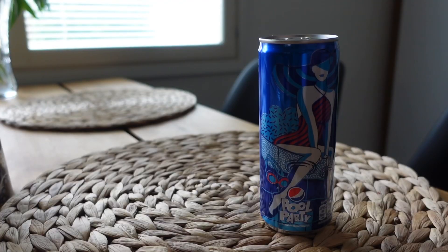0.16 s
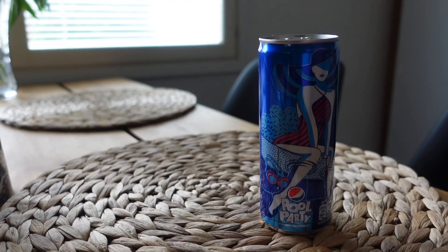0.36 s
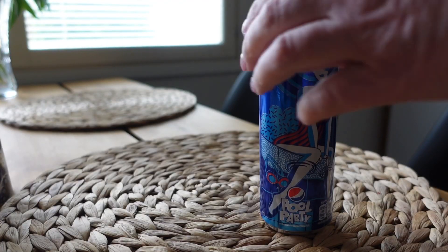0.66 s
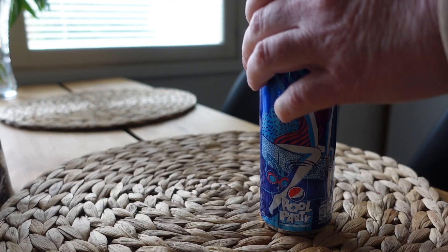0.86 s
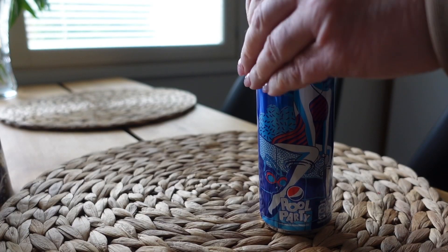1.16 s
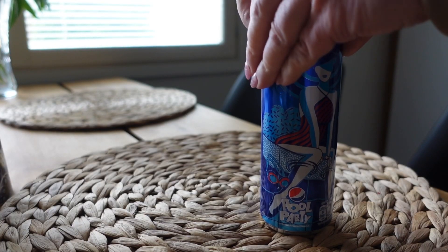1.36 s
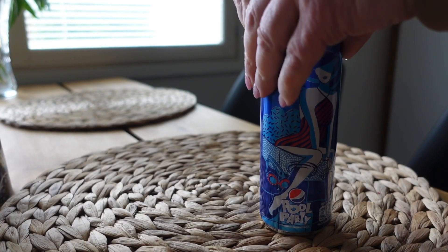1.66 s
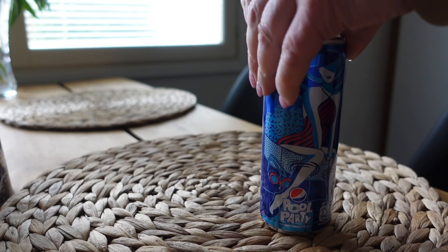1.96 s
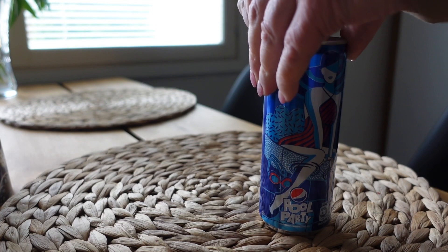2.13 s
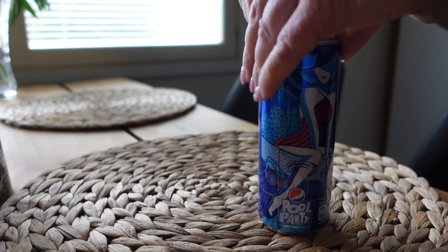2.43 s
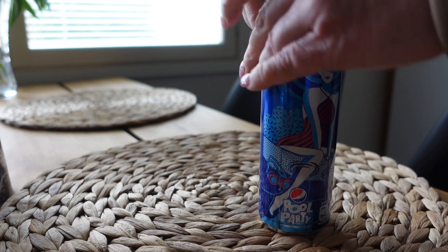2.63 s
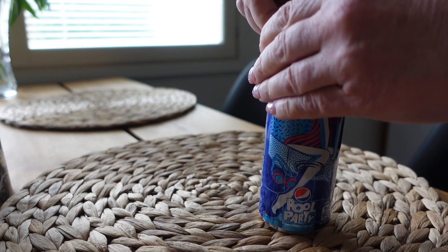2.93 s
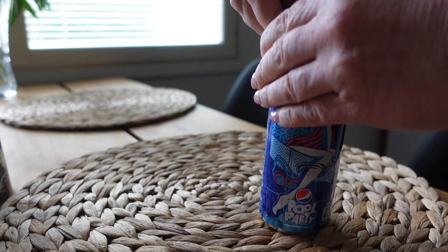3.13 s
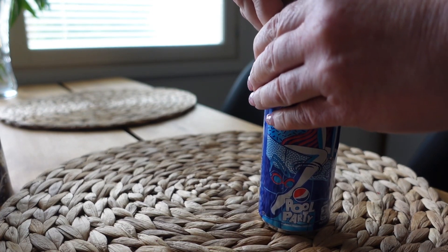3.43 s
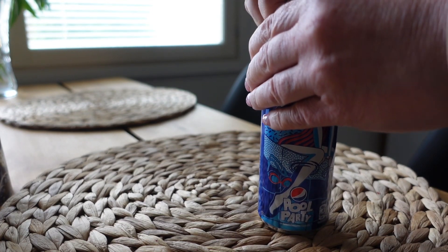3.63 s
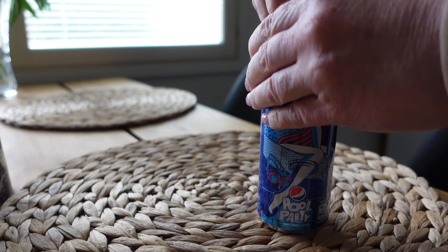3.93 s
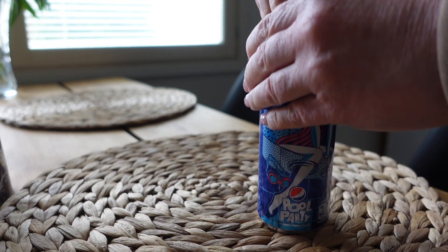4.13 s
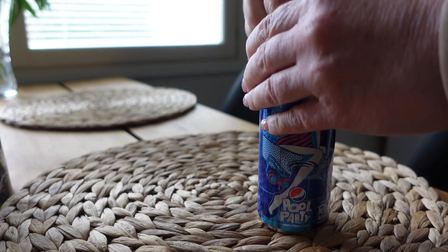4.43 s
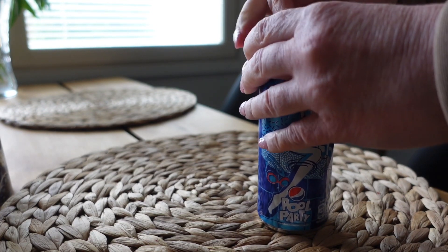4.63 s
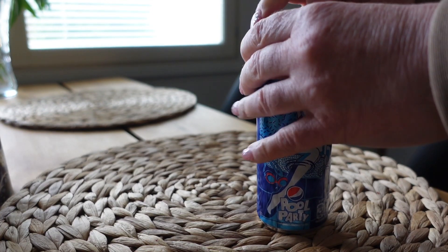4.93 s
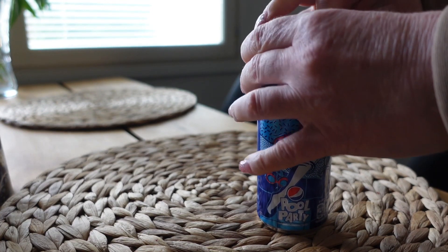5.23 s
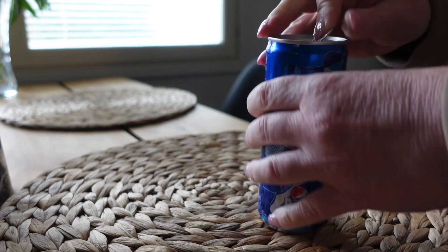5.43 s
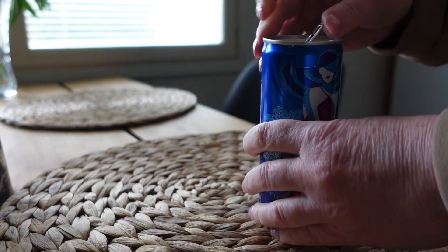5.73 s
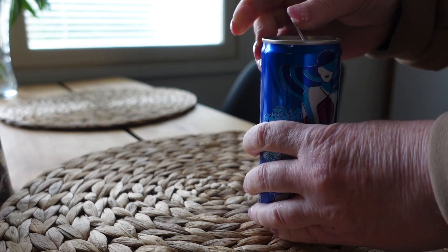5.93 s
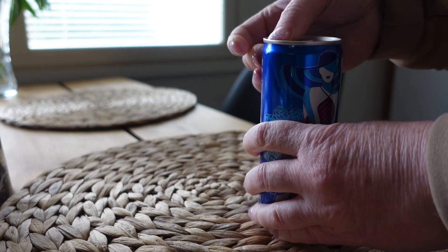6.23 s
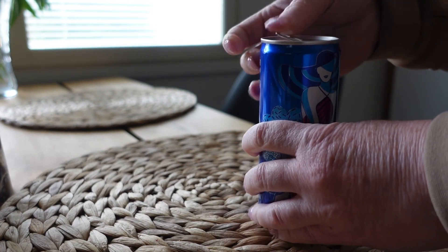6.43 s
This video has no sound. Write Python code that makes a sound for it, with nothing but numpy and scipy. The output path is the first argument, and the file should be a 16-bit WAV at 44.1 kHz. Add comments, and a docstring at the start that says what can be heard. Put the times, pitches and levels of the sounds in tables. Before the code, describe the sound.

Fingernail clicks on a metal drink can's tab, a sharp crack and two short loud gas hisses, then the flap tears open with a hollow pop.

```python
"""A small room: an aluminium drink can is opened on a table, close to a pair of microphones.
A fingernail flicks the tab, the seal cracks and gas hisses from a pinhole, then twice from a widening slit.
The lid ticks as it relaxes, the flap tears open over the hollow headspace, and the tab is bent back.
Metal is damped sines set off by snaps or tiny slips; gas, cloth and skin are shaped noise.
Near echoes, a short tail, steady room noise and a treble-keyed gain control complete the sound."""
import sys
import numpy as np
from scipy import signal
from scipy.fft import rfft, irfft, next_fast_len
from scipy.io import wavfile

SR = 44100
rng = np.random.default_rng(int(sys.argv[2]) if len(sys.argv) > 2 else 0)


def persist_wave(psi):
    """Save psi, clipped to +-1, as 16-bit WAV."""
    counts = np.round(np.clip(psi, -1, 1) * 32767).astype(np.int16)
    wavfile.write(sys.argv[1], SR, np.atleast_2d(counts).T)


N = 290123
TIME = np.arange(N) / SR

# Source levels are those before the room and the gain control.
# Room noise: (frequency [Hz], relative level [dB per Hz]); its left-right likeness: (frequency [Hz], coherence)
AIR_TONE = [(15, -77), (25, -36), (195, -8), (301, -8.5), (439, -13), (714, -4.5), (863, -14), (1190, -13),
            (1560, -13.5), (2690, -14), (3080, -19), (3430, -20.5), (5000, -22), (11600, -25),
            (16000, -33.5)]
AIR_LIKENESS = [(60, 0.78), (250, 0.6), (700, 0.25), (2000, 0.12), (6000, 0.91), (15000, 1)]
AIR_DB = -63
# The hands reach, shift their grip and let go: (time [s], level [dB], bell half width [s])
HAND_MOVES = [(.62, -55.5, 0.21), (2.85, -63, 0.11), (4.6, -73.5, 1), (5.47, -61, 0.076),
              (5.77, -59, 0.071)]
# Colour of the cloth: (frequency [Hz], relative level [dB per Hz])
SLEEVE_TONE = [(590, -34), (1000, -15), (1470, -4.5), (1830, -8), (2940, -4.5), (4360, -6.5), (14800, -8.5),
               (16000, -4.5)]
# Snaps of the tab and lid:
# (time [s], level [dB], brightness [dB per octave], note of the spot that gives way [Hz])
SNAPS = [(0.9011, -49, -7, 2490), (1.0535, -34.5, 6, 2690), (1.0738, -34, 4.5, 7100),
         (1.1088, -30.5, 6.5, 2620), (1.2285, -41.5, 3, 2700), (1.2555, -30, 4, 6250),
         (1.6196, -51, 7.5, 7600), (2.1644, -22.5, 12, 7550), (2.5015, -31, -2, 3100),
         (3.321, -40.5, -2.5, 3880), (3.4748, -31.5, 1, 3870), (3.4831, -19, 5, 8620),
         (3.6106, -28.5, 3, 4200), (3.7195, -19, 4, 8300), (3.7415, -29.5, 6.5, 5250),
         (3.7587, -18, 7.5, 5050), (3.8499, -23, 7, 4600), (3.8654, -21, 5.5, 8280), (4.0275, -29, 2, 3790),
         (4.1084, -33, 0, 3400), (4.126, -15, 8.5, 3830), (4.1286, -14.5, 6.5, 2560),
         (4.459, -35.5, -9, 2500), (4.626, -40, 0.5, 2410), (5.578, -41, -0.5, 2320),
         (5.629, -57, -6, 1230), (5.832, -53, -1, 5700), (5.873, -51.5, 1, 4280), (6.2208, -35.5, 3, 5000)]
# Colour of the metal's crack: (frequency [Hz], relative level [dB per Hz])
CRACK_TONE = [(10000, -4.5), (16000, -7.5)]
CRACK_T60, NOTE_T60 = .0075, .011  # s
NOTE_DB = -4  # the spot's own note, against the rest of the snap
# Modes of the lid, taut with pressure, once cracked, while the flap tears, and with the tab bent up:
# (nominal frequency [Hz], relative level [dB])
TAUT = [(1490, -10.5), (2590, 9), (5060, 2.5), (5600, 4), (6300, -0.5), (7100, 2.5), (8900, 0), (11000, -7)]
CRACKED = [(2320, -4), (3800, -5.5), (4600, 3), (5100, 1), (7080, 1), (8200, 0), (9700, -5.5),
           (11500, -3.5)]
TEARING = [(1200, -2.5), (1520, -5.5), (3850, -1.5), (5080, -7)]
OPEN = [(1260, 5), (1520, -2), (2150, -4), (2900, -2), (3450, -3.5), (9400, -1.5)]
CRACKED_S, TEARING_S, OPEN_S = 2.3, 4.55, 5.2  # when each later set of modes takes over
# The fingernail skids on the tab: (time [s], level [dB], bell half width [s])
SKIDS = [(1.054, -43, 0.0032), (1.104, -40.5, 0.0026), (1.257, -34.5, 0.0016), (1.31, -56, 0.012),
         (3.312, -44.5, 0.005), (3.873, -35.5, 0.0027), (4.634, -44.5, 0.0071)]
# The metal rips along the score in jerks: (time [s], level [dB], decay constant [s])
RIPS = [(2.164, -29.5, 0.038), (3.722, -35.5, 0.026), (4.7701, -27, 0.003), (4.7762, -21.5, 0.005),
        (4.79, -17.5, 0.0096), (4.801, -20, 0.0071), (4.8225, -19, 0.0036)]
# The first gas leaves as a puff each time the seal breaks: (time [s], approximate peak level [dB])
PUFFS = [(2.164, -30), (3.4823, -20.5), (4.1264, -18.5)]
# Gas through the pinhole, its surge as it gives way, the slit and the wide slit:
# (time [s], attack constant [s], hold [s], top flow level [dB], swell [dB per s], fade [dB per s])
JETS = [(2.1905, 0.002, 0.22, -10, 38.5, 157), (2.36, .02, 0.091, -12.5, 51.5, 335),
        (3.484, 0.0033, 0.042, -20, 140, 176.5), (4.127, .018, 0.086, -17.5, 8.5, 127.5)]
# Colour of each jet: (frequency [Hz], relative level [dB per Hz])
PINHOLE_TONE = [(300, -60), (1100, -49), (1700, -25.5), (2450, -11.5), (3300, -21), (3900, -7), (5700, -5),
                (6600, 1), (7900, 4), (8600, 1.5), (11000, 2), (13500, 10), (16000, 7)]
SURGE_TONE = [(900, -38), (1600, -17), (2400, -7.5), (3300, -12), (4500, -10), (8000, 6.5), (12000, 6),
              (16000, 3)]
SLIT_TONE = [(150, -57.5), (450, -27.5), (1300, -23), (2030, -7), (2600, -14), (3650, 3), (5200, 2),
             (5700, -2), (8800, -1), (10200, -13), (16000, -21)]
WIDE_TONE = [(200, -61.5), (560, -34), (760, -8), (1400, -15), (2000, -7.5), (3100, 1), (5200, -3),
             (6400, -9), (7000, -10), (10000, -11), (12000, -15.5), (16000, -29)]
GUSTS_PER_S = 110
# The tab creaks on its rivet: (time [s], level [dB], bell half width [s])
CREAKS = [(4.757, -48, 0.0019), (5.587, -43.5, 0.0051), (5.688, -57, 0.019), (6.454, -45.5, 0.0012)]
# The bent tab drags over the lid: (time [s], level [dB], bell half width [s])
DRAG = [(5.55, -62, 0.087)]
# The resonances it rubs: (frequency [Hz], width [Hz], relative level [dB])
DRAG_RINGS = [(1483, 23, -3), (3470, 180, -2)]
# Near surfaces: (delay [s], level [dB])
ECHOES = [(.0041, -16.5), (.0088, -29.5), (0.0104, -16.5)]
# Decay of the tail: (frequency [Hz], T60 [s])
ROOM_T60 = [(300, 0.77), (1200, 0.51), (4000, 0.41), (8000, 0.33), (15000, 0.23)]
# Width of the tail: (frequency [Hz], side over mid [dB])
ROOM_SIDE = [(300, -13.5), (1200, -7.5), (2300, -18.5), (4500, -12), (9000, -35.5), (15000, -34)]
# Gain control [dB per dB] and its averaging time [s]; overload ceiling [full scale]; top of the band [Hz]
SQUEEZE, SENSE_S, CEILING, EDGE_HZ = .68, .012, .7, 15960


def amp(db):
    """Decibels to gain."""
    return 10 ** (np.asarray(db) / 20)


def unit(x):
    """Scales to rms 1."""
    return x / np.sqrt(np.mean(x ** 2) + 1e-20)


def struck(x):
    """Scales a hit to rms 1 over its first 4 ms."""
    return x / np.sqrt(np.mean(x[:176] ** 2))


def read(points, hz):
    """A spectrum, joined by straight lines over log frequency."""
    f, value = np.transpose(points)
    return np.interp(np.log(hz + 1), np.log(f + 1), value)


def colour(x, points):
    """Filters by a (frequency [Hz], level [dB]) spectrum."""
    size = next_fast_len(len(x))
    gain = amp(read(points, np.fft.rfftfreq(size, 1 / SR)))
    return irfft(rfft(x, size) * gain, size)[:len(x)]


def low_pass(hz):
    """A gentle second-order low-pass filter."""
    return signal.butter(2, hz, fs=SR, output="sos")


def high_pass(order, hz):
    """A high-pass filter of the given order."""
    return signal.butter(order, hz, "high", fs=SR, output="sos")


def wander(per_s):
    """A random curve of rms 1: straight lines between per_s random points a second."""
    return unit(np.interp(TIME * per_s, np.arange(8000), rng.standard_normal(8000)))


def add(mix, s, sound):
    """Mixes a sound in at time s."""
    part = mix[round(s * SR):][:len(sound)]
    part += sound[:len(part)]


def since(s):
    """Seconds gone by after time s, zero before it."""
    return np.maximum(TIME - s, 0)


def swells(rows):
    """Gain over time of bell-shaped strokes."""
    return sum(amp(db) * np.exp(-((TIME - s) / half) ** 2 / 2) for s, db, half in rows)


def jerks(rows):
    """Gain over time of strokes that start at once and die away."""
    return sum(amp(db) * (TIME > s) * np.exp(-since(s) / decay) for s, db, decay in rows)


def lid(s):
    """The modes that the lid has at time s."""
    if s < CRACKED_S:
        return TAUT
    if s < TEARING_S:
        return CRACKED
    return TEARING if s < OPEN_S else OPEN


def ring(modes, strike=1., detune=0.96, t60_1k=0.026, steepness=0.56):
    """The lid's answer to one impulse: sines that die the sooner the higher they are."""
    t = np.arange(3000)[:, None] / SR
    hz, db = np.transpose(modes)
    t60 = t60_1k * (hz / 1000) ** -steepness  # t60_1k is the T60 [s] at 1 kHz
    weight = strike * (-1) ** np.arange(len(hz))
    return (weight * amp(db - 60 * t / t60) * np.sin(2 * np.pi * hz * detune * t)).sum(1)


def slips(effort, modes, per_s, grit_db, tone, spread_db=3):
    """Metal rubs or gives way in many tiny slips, each a click that rings the lid."""
    happens = rng.random(N) < per_s / SR
    size = amp(spread_db * np.minimum(rng.exponential(1, N), 3)) * happens
    force = unit(size * rng.choice([-1, 1], N)) * effort
    body = ring(modes)
    rung = signal.oaconvolve(force, body / np.linalg.norm(body))[:N]
    return colour(rung + amp(grit_db) * force, tone)


def air():
    """Steady room noise, partly alike at the two microphones."""
    hz = np.fft.rfftfreq(N, 1 / SR)
    a, b = rfft(rng.standard_normal((2, N))) * amp(read(AIR_TONE, hz))
    same = np.clip(read(AIR_LIKENESS, hz), -1, 1)
    mid, side = a * np.sqrt(1 + same), b * np.sqrt(1 - same)
    return amp(AIR_DB) * unit(irfft([mid + side, mid - side], N))


def sleeve(resting_db=-76, grain_db=0.5, ticks_per_s=25, tick_db=-11):
    """Cloth rustles and fingers tick on the can, very faintly throughout and more with each move."""
    grain = rng.standard_normal(N) * amp(grain_db * wander(550))
    rustle = unit(colour(grain, SLEEVE_TONE))
    touches = rng.standard_normal(N) * (rng.random(N) < ticks_per_s / SR)
    ticks = unit(signal.oaconvolve(touches, ring(CRACKED))[:N])
    return (amp(resting_db) + swells(HAND_MOVES)) * (rustle + amp(tick_db) * ticks)


def snaps(spread=0.015, strike_db=1.0, crack_db=7, rise_s=0.00017, bass_hz=1200,
          tilt_from_hz=2000, tilt_to_hz=9000):
    """Each snap is a short crack of metal, the lid's damped ring and the note of the spot that gives way."""
    out, t = np.zeros(N), np.arange(3000) / SR
    onset = 1 - np.exp(-t / rise_s)
    for s, db, brightness, note_hz in SNAPS:
        modes = lid(s)
        # random level and tuning of each mode
        place, pressure = rng.standard_normal((2, len(modes)))
        rung = ring(modes, amp(strike_db * place), 1 + spread * pressure)
        crack = amp(crack_db - 60 * t / CRACK_T60) * colour(rng.standard_normal(len(t)), CRACK_TONE)
        hit = (rung + crack) * onset
        hit = signal.sosfilt(high_pass(2, bass_hz), hit)  # thin sheet is weak in the bass
        # the more sudden the snap, the brighter
        tilt = [(tilt_from_hz, 0), (tilt_to_hz, brightness * np.log2(tilt_to_hz / tilt_from_hz))]
        hit = colour(np.pad(hit, (0, len(t))), tilt)[:len(t)]
        note = onset * amp(-60 * t / NOTE_T60) * np.cos(2 * np.pi * note_hz * t)
        add(out, s, amp(db) * struck(struck(hit) + amp(NOTE_DB) * struck(note)))
    return out


def skids():
    """The fingernail and the tab chatter over the lid, which rings as it is at that moment."""
    tone = [(300, -22), (2400, 1.5), (5000, -3.5), (16000, -6.5)]
    return sum(slips(swells([skid]), lid(skid[0]), per_s=4900, grit_db=4, tone=tone) for skid in SKIDS)


def tear():
    """Each rip is a run of slips that rings the lid as it is at that moment."""
    tone = [(650, -39.5), (1300, -2), (2500, -8), (3900, -1.5), (6000, -2), (9000, 5), (16000, 0)]
    return sum(slips(jerks([rip]), lid(rip[0]), per_s=2500, grit_db=-1.5, tone=tone) for rip in RIPS)


def puffs(push_s=0.00011):
    """The sudden release of pressure: one push of air and a shallow rebound."""
    out, u = np.zeros(N), np.arange(1000) / SR / push_s
    for s, db in PUFFS:
        add(out, s, amp(db) * 2 * u * (2 - u) * np.exp(-u))
    return out


def flow(row):
    """Gain over time of a jet: it swells as the gap widens and fades as the pressure falls."""
    s, attack_s, hold_s, top_db, swell, fade = row
    narrow_db = swell * np.maximum(hold_s - since(s), 0)
    spent_db = fade * since(s + hold_s)
    return (1 - np.exp(-since(s) / attack_s)) * amp(top_db - narrow_db - spent_db)


def jet(row, tone, dulling, sputter_db, knee_hz, gust_db=0.04):
    """Turbulent gas: droplets make it sputter, body and treble gust apart, falling pressure dulls it."""
    s, _, hold_s, _, _, fade = row
    sputtering = rng.standard_normal(N) * amp(sputter_db * wander(500))
    hiss = unit(colour(sputtering, tone))
    body = signal.sosfiltfilt(low_pass(knee_hz), hiss)
    treble = hiss - body
    body_db, treble_db = (gust_db * wander(GUSTS_PER_S) for _ in range(2))
    dulled_db = dulling * fade * since(s + hold_s)  # treble fades by this much more
    return flow(row) * (amp(body_db) * body + amp(treble_db - dulled_db) * treble)


def whistle(row, hz=9800, width_hz=450, db=-12, waver_hz=170, wavers_per_s=25, stall_db_per_s=120):
    """The sharp edge of the pinhole gives a fuzzy, wavering whistle that stalls as the pressure falls."""
    s, _, hold_s, *_ = row
    fuzz = unit(signal.sosfilt(low_pass(width_hz / 2), rng.standard_normal(N)))
    turns = np.cumsum(hz + waver_hz * wander(wavers_per_s)) / SR
    level = amp(db - stall_db_per_s * since(s + hold_s))  # on top of the jet's own flow
    return level * flow(row) * unit(fuzz * np.sin(2 * np.pi * turns))


def gas():
    """All four jets hiss through their openings, and the pinhole also whistles."""
    pinhole, surge, slit, wide = JETS
    return (jet(pinhole, PINHOLE_TONE, dulling=0.31, sputter_db=0.1, knee_hz=8900)
            + whistle(pinhole)
            + jet(surge, SURGE_TONE, dulling=0.25, sputter_db=4.0, knee_hz=8000)
            + jet(slit, SLIT_TONE, dulling=0.32, sputter_db=2.4, knee_hz=5725)
            + jet(wide, WIDE_TONE, dulling=0.52, sputter_db=1.5, knee_hz=5600))


def wall(hz=560, share_db=-38, t60=.2):
    """While the lid is cracked, each snap also sets the wall of the can faintly ringing."""
    return sum(amp(db + share_db - 60 * since(s) / t60) * np.sin(2 * np.pi * hz * since(s))
               for s, db, *_ in SNAPS if lid(s) is CRACKED)


def creaks():
    """The tab creaks on its rivet in short runs of slips, all with the ring of the OPEN modes."""
    tone = [(500, -24), (1200, -4.0), (2700, 9.5), (4600, -5.5), (12000, 0.0)]
    return slips(swells(CREAKS), OPEN, per_s=2100, grit_db=-38.0, tone=tone)


def pop(s=4.7945, db=-14.5, hz=1130, t60=0.039, rise_s=0.0042, sag_hz=200, settle_s=0.0045,
        hollow_hz=1195, hollow_db=-29, hollow_t60=0.19):
    """The flap's note sags as it swings down; the hollow headspace rings on under the opening."""
    t = since(s)
    turns = np.cumsum(hz + sag_hz * np.exp(-t / settle_s)) / SR
    flap = amp(db - 60 * t / t60) * np.sin(2 * np.pi * turns)
    hollow = amp(hollow_db - 60 * t / hollow_t60) * np.sin(2 * np.pi * hollow_hz * t)
    return (1 - np.exp(-t / rise_s)) * (flap + hollow)


def skin(s=5.54, db=-60, half_s=0.1, above_hz=8000):
    """The holding hand slides down the wall of the can with a thin, dry hiss."""
    hiss = signal.sosfilt(high_pass(2, above_hz), rng.standard_normal(N))
    return swells([(s, db, half_s)]) * unit(hiss)


def drag():
    """Steady friction of the tab keeps two resonances of the open can faintly singing."""
    friction = rng.standard_normal(N)
    sung = np.zeros(N)
    for hz, width, db in DRAG_RINGS:
        sung += amp(db) * unit(signal.lfilter(*signal.iirpeak(hz, hz / width, fs=SR), friction))
    return swells(DRAG) * unit(sung)


def hum(s=6.52, db=-64, hz=250, width_hz=90):
    """A faint low hum, noise passed twice through one resonance, comes in at the very end."""
    band = signal.iirpeak(hz, hz / width_hz, fs=SR)
    humming = signal.lfilter(*band, signal.lfilter(*band, rng.standard_normal(N)))
    return amp(db) * (TIME > s) * unit(humming)


def room(x, tail_db=-8, build_s=0.0028):
    """Near surfaces echo first, then a diffuse tail dies, soonest in the treble; ROOM_SIDE sets its width."""
    t = np.arange(SR * 3 // 4) / SR
    hz, frame_s, z = signal.stft(rng.standard_normal((2, len(t))), SR, nperseg=256)
    decay = amp(-60 * frame_s / read(ROOM_T60, hz)[:, None])
    tails = signal.istft(z * decay, SR, nperseg=256)[1][:, :len(t)]
    tails = tails * (1 - np.exp(-(t / build_s) ** 2))
    mid, side = amp(tail_db) * tails / np.linalg.norm(tails[0])
    side = colour(side, ROOM_SIDE)
    for s, db in ECHOES:
        add(mid, s, amp([db]))
    # the sound sent into the echoes and tail flutters quickly, which blurs its rings
    thrown = x * unit(1 + .6 * wander(600))
    return x + signal.fftconvolve(thrown[None], np.array([mid + side, mid - side]), axes=1)[:, :N]


def scene():
    """The can and the hands in the room, with the room noise and the hum."""
    can = snaps() + skids() + tear() + puffs() + gas() + wall() + creaks() + pop() + drag()
    can = signal.sosfilt(high_pass(3, 130), can)  # so small a body radiates little bass
    return room(can + sleeve() + skin()) + air() + hum()


def record(dry, threshold_db=-23.0, sense_hz=9500, low_cut_hz=55):
    """Sustained treble turns the whole level down; peaks overload softly; then the band is limited."""
    treble = signal.sosfilt(high_pass(4, sense_hz), dry.mean(0))
    keep = np.exp(-1 / (SENSE_S * SR))
    power_db = 10 * np.log10(signal.lfilter([1 - keep], [1, -keep], treble ** 2) + 1e-14)
    ducked = dry * amp(-SQUEEZE * np.maximum(power_db - threshold_db, 0))
    rounded = ducked / (1 + (ducked / CEILING) ** 6) ** (1 / 6)
    thinned = signal.sosfilt(high_pass(2, low_cut_hz), rounded)
    band = signal.firwin(601, EDGE_HZ, window=("kaiser", 8), fs=SR)
    return signal.oaconvolve(thinned, band[None], "same")


dry = scene()
out = record(dry)
persist_wave(out)
```